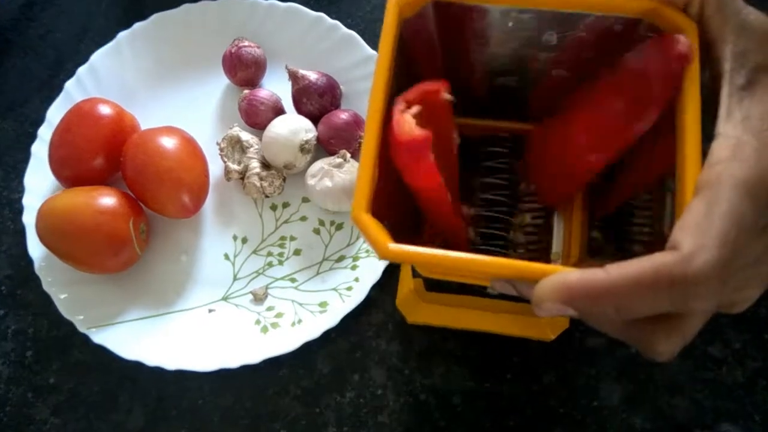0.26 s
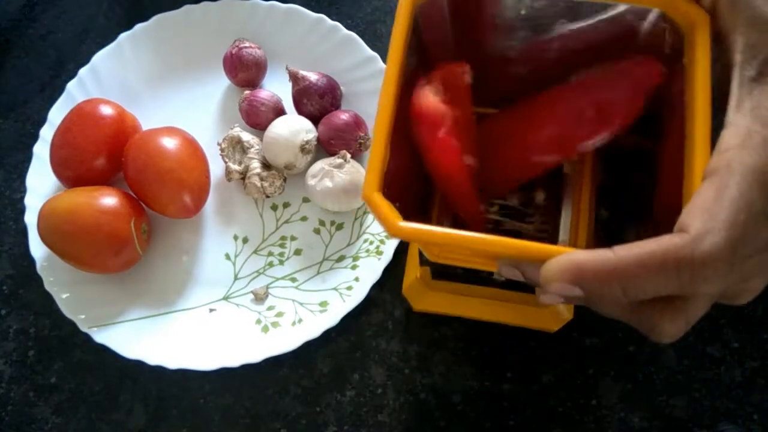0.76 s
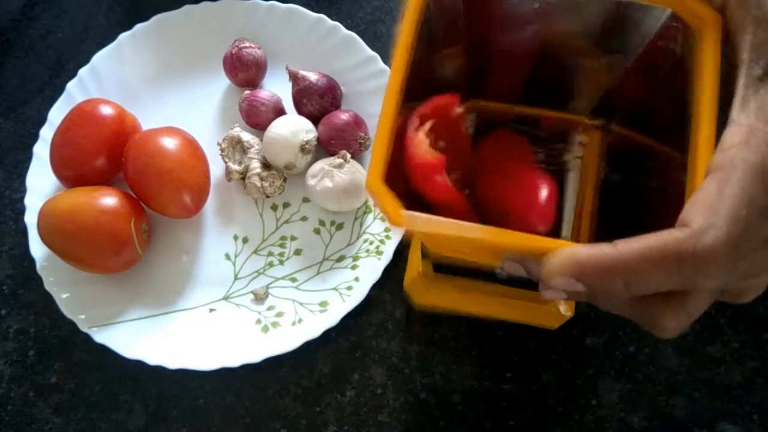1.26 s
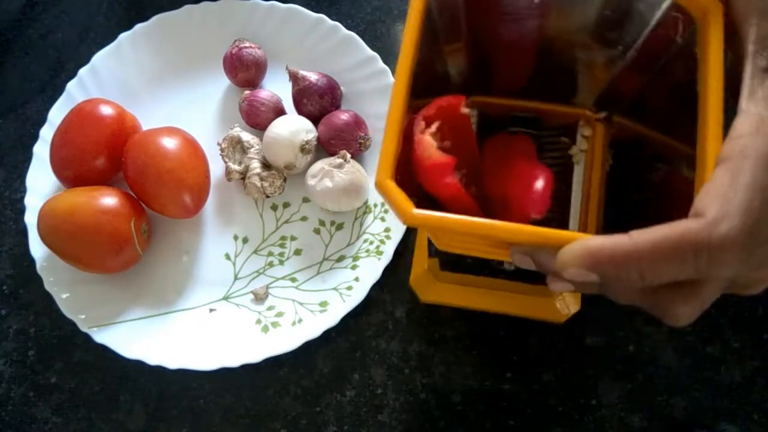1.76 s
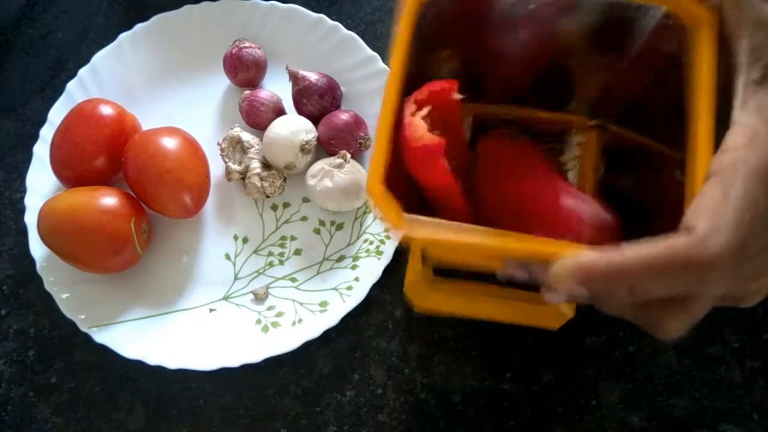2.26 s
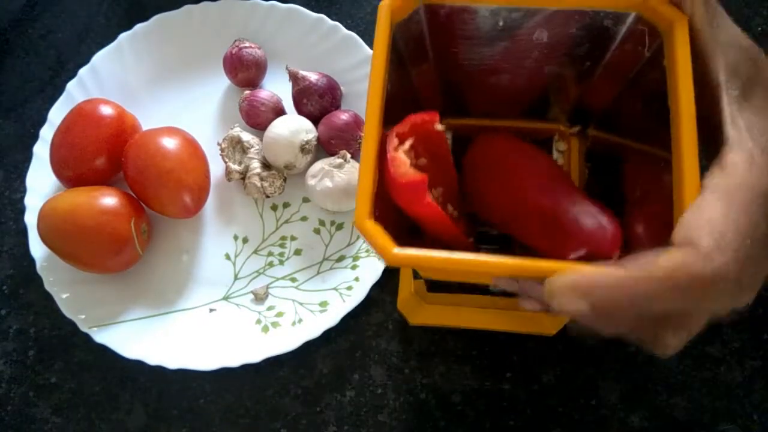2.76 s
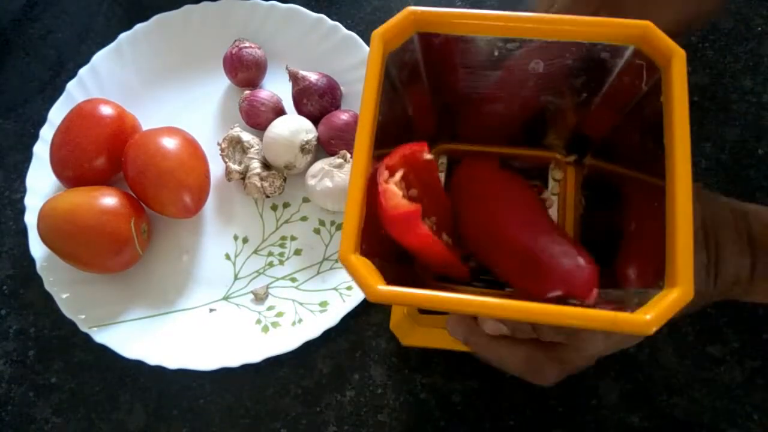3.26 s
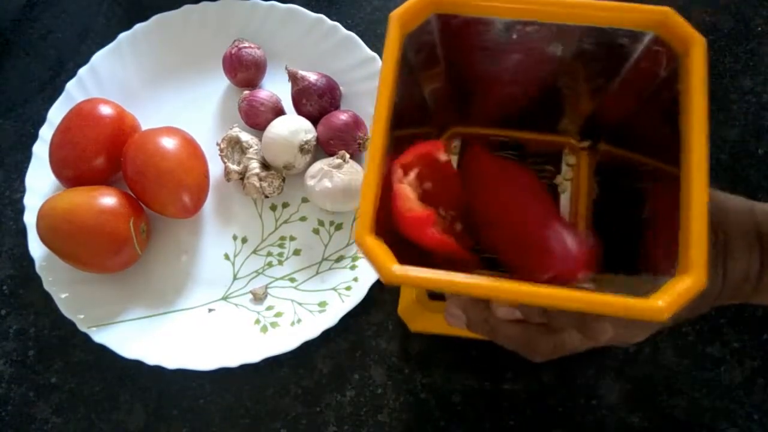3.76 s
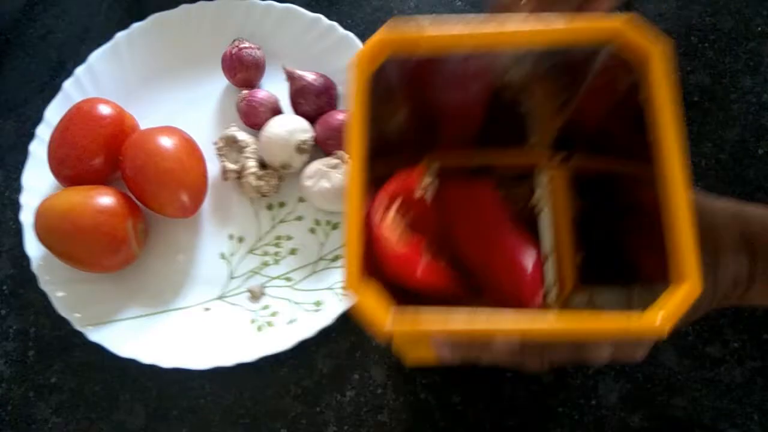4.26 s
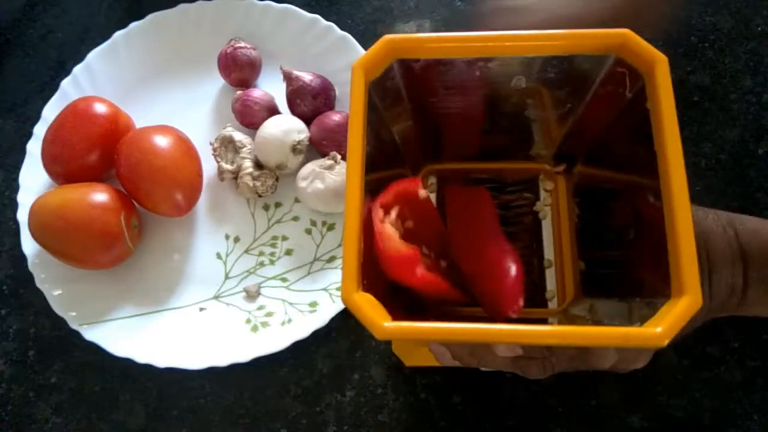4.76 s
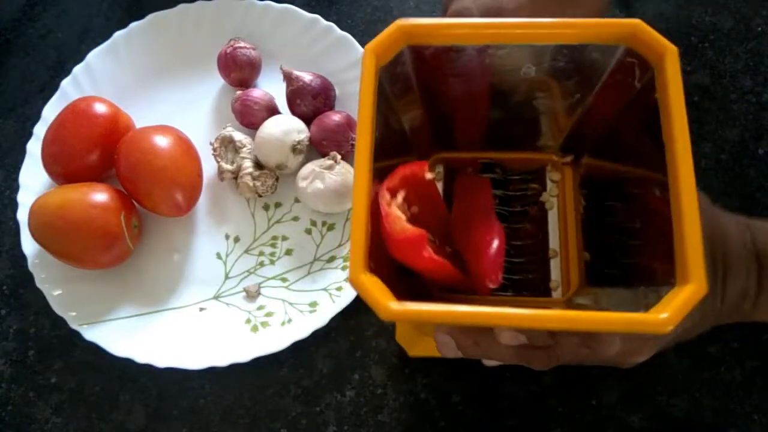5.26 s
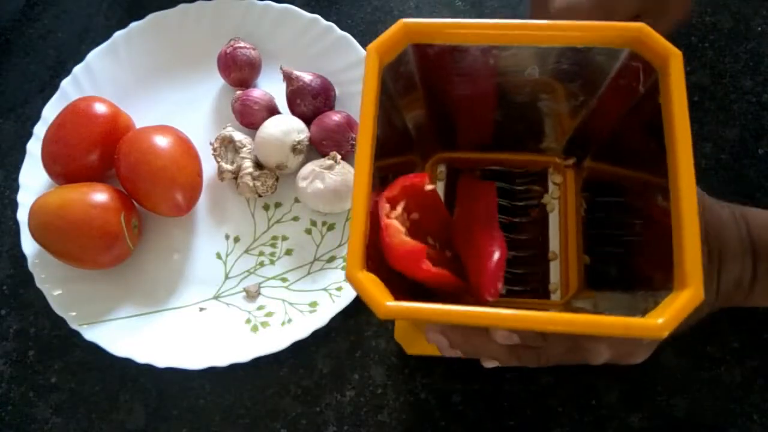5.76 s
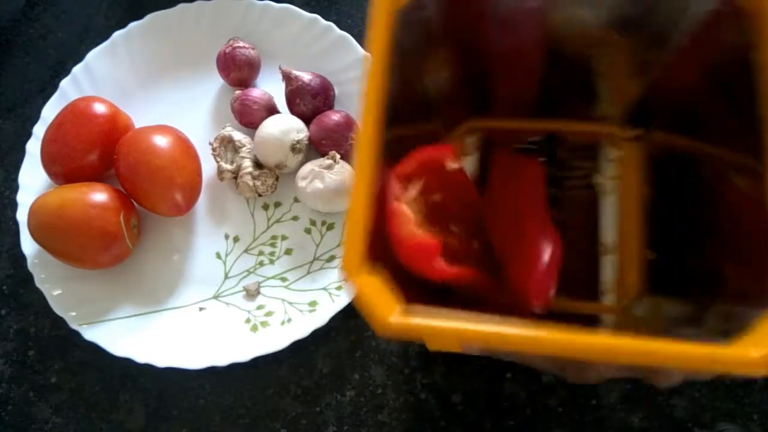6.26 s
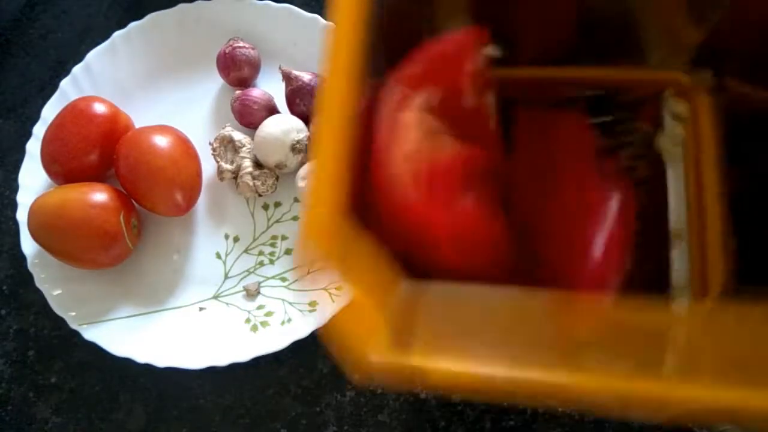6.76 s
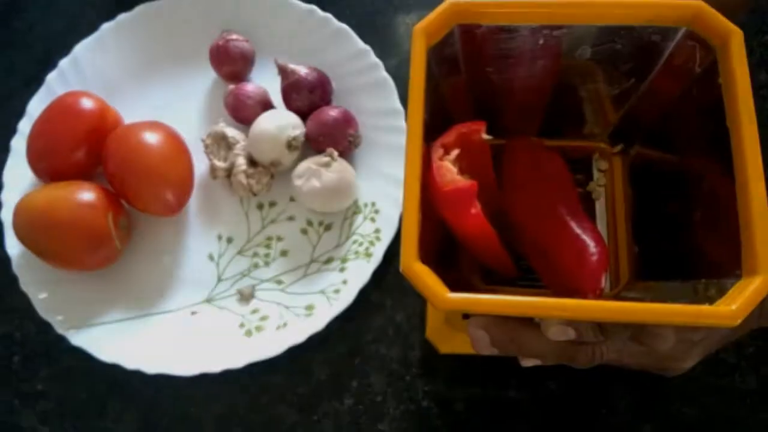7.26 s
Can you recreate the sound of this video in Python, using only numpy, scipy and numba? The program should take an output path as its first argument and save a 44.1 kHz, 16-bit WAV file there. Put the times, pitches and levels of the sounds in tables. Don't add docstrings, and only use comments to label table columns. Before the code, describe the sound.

Irregular hollow plastic clacks, thin metallic ticks and rough scrapes come from a chopper handled in a small, hard-surfaced kitchen. The first two seconds are busy, a near-quiet gap follows, then a second rattling run brings a hard crack before scattered knocks. Low grip rumble passes underneath. The phone pickup is close, left-heavy and slightly dull on top, with short reflections and very faint house hum.

```python
import sys
import numpy as np
from scipy import signal
from scipy.fft import rfft, irfft
from scipy.io import wavfile
from scipy.ndimage import uniform_filter1d
from numba import njit

SR = 44100
rng = np.random.default_rng(int(sys.argv[2]) if len(sys.argv) > 2 else 0)


def file_out(sig):
    cols = np.atleast_2d(sig).T
    lim = np.clip(cols, -1, 1)
    pcm = np.round(lim * 32767).astype(np.int16)
    wavfile.write(sys.argv[1], SR, pcm)


def invert_db(x):
    u = np.asarray(x, float) / 20
    return 10 ** u


N = 331171


def unit(x):
    return x / np.sqrt(np.mean(x ** 2))


def band(x, lo_hz, hi_hz, order=2):
    return signal.sosfilt(signal.butter(order, [lo_hz, hi_hz], "bandpass", fs=SR, output="sos"), x)


def walk(rate_hz):
    hold = max(int(SR / rate_hz), N // 4000)
    levels = rng.standard_normal(4096)[np.arange(N) // hold]
    return 1.51 * uniform_filter1d(uniform_filter1d(levels, hold), hold)


def mode_pole(hz, t60):
    return np.exp(2j * np.pi * hz / SR - np.log(1000) / (t60 * SR))


def ring(x, hz, t60):
    pole = mode_pole(hz, t60)
    return signal.lfilter([0, pole.imag], [1, -2 * pole.real, abs(pole) ** 2], x)


def unlike(hz):
    return np.clip(0.33 + 0.18 * np.log2(hz / 500), 0, .97)


def hum():
    # (frequency [Hz], level per Hz [dB])
    hum_spectrum = [(15, -71.5), (25, -35), (65, -22.5), (86, -6.5), (148, -4.5), (188, -19.5),
                    (232, -11.5), (295, -30.5), (559, -15), (676, -29.5), (2490, -37.5), (2810, -30.5),
                    (7250, -39), (9420, -75.5), (16000, -120)]
    spectrum_hz, spectrum_db = np.transpose(hum_spectrum)
    hz = np.arange(N // 2 + 1) * SR / N + 1
    colour = invert_db(np.interp(np.log(hz), np.log(spectrum_hz), spectrum_db))
    mid, other = unit(irfft(rfft(rng.standard_normal((2, N))) * colour, N))
    right = invert_db(-15.0) * (0.47 * mid + .8 * other)
    return invert_db(-70.0) * np.array([mid, right])


def kitchen(x):
    # (centre [Hz], t60 [s], level [dB])
    echo_bands = [(258.7, 0.85, -7.5), (711, 0.45, -3.5), (1780, 0.38, -5.5), (3960, 0.26, -8),
                  (6440, 0.093, -7)]
    t = np.arange(SR // 2) / SR
    noise = rng.standard_normal((len(echo_bands), 2, len(t)))
    tail = np.zeros((2, len(t)))
    for (hz, t60, db), grain in zip(echo_bands, noise):
        decay = invert_db(db - 60 * t / t60) / np.sqrt(t60 * SR / 14)
        tail += decay * band(grain, hz / 1.67, hz * 1.53)
    tail *= np.clip((t - .003) / 0.006, 0, 1)
    return signal.fftconvolve(tail, x[None], axes=1)[:, :N]


def grip(level_db):
    worktop = unit(ring(rng.standard_normal(N), 145., 0.12))
    worktop = worktop + 0.53 * unit(ring(rng.standard_normal(N), 105., 0.13))
    return unit(band(worktop, 85., 310.0)) * invert_db(level_db + 2.0 * walk(22))


def scrape(part, level_db, grain_db, flicker_db):
    slips = rng.standard_normal((2, N)) * invert_db(grain_db * walk(300) + 2.0 * walk(35))
    out = np.zeros((2, N))
    for hz, db, t60 in part:
        near, other = ring(slips, hz, t60) * invert_db(db + flicker_db * walk(16))
        far = np.sqrt(1 - unlike(hz) ** 2) * near + unlike(hz) * other
        out += [near, far]
    return unit(out) * invert_db(level_db)


@njit
def strike(contacts, poles, gains):
    out = np.zeros((len(contacts), 2, contacts.shape[1]))
    for e in range(len(contacts)):
        for m in range(poles.shape[1]):
            z = 0j
            for i in range(contacts.shape[1]):
                z = z * poles[e, m] + contacts[e, i] + 1e-18
                out[e, 0, i] += (gains[e, m, 0] * z).imag
                out[e, 1, i] += (gains[e, m, 1] * z).imag
    return out


def knocks(part, column, trim_db):
    # (time [s], hopper [dB], walls [dB], blades [dB], swell [ms], chatter [ms])
    knock_events = [(0.024, -46.0, -58.5, -65, 0.7, 17), (0.077, -25, -26.5, -56, 0.3, 3.7),
                    (0.097, -36.5, -48, -55, 0.4, 3.1), (0.105, -39.5, -42, -38, 9.1, 4.9),
                    (0.126, -39.5, -49, -50.0, 4.2, 11.7), (0.164, -36.0, -44.5, -45, 3.6, 13),
                    (0.219, -44.5, -59, -68, 1.4, 5.5), (0.237, -50.5, -58, -48.5, 9.1, 6.1),
                    (0.284, -50, -62, -62, 3.2, 3.2), (0.301, -48, -37.5, -42.5, 6.7, 7.1),
                    (0.331, -61, -57, -49.0, 0.85, 2.4), (0.355, -51, -54, -56, 1.8, 2.5),
                    (0.383, -31.5, -37, -53, 0.74, 9), (0.414, -44, -49.0, -44.5, 1.9, 4.5),
                    (0.427, -48, -48, -46.5, 3.7, 6.9), (0.574, -44, -39, -45, 0.68, 9.4),
                    (0.659, -27.5, -28.0, -42, 0.7, 9.4), (0.759, -35, -47.5, -54.5, 1.8, 13.6),
                    (0.774, -40.5, -44, -41, 7.7, 9.8), (0.789, -36, -31.5, -35.5, 1.4, 6.8),
                    (0.837, -39.5, -41.5, -45, 0.94, 6.9), (0.874, -40, -61, -58.0, 2.8, 4),
                    (0.891, -41.5, -43, -43.0, 25.0, 11.8), (0.938, -44.5, -41, -46, 9.1, 4.3),
                    (1.039, -43, -46.5, -46.0, 11, 15.1), (1.077, -41.5, -42, -46.5, 28, 12),
                    (1.113, -52, -48, -45.0, 21.2, 3.7), (1.141, -38, -47.5, -42, 16.4, 11),
                    (1.165, -36.5, -33.5, -41, 1.2, 5), (1.256, -42.5, -47.5, -43, 10.7, 11.0),
                    (1.287, -43.5, -45.5, -45, 7.7, 8.2), (1.31, -51, -62, -47, 14.6, 21),
                    (1.379, -60, -55, -44.0, 14, 17), (1.43, -41, -46.5, -39.5, 14, 25.0),
                    (1.496, -38, -42.5, -40.5, 0.9, 2.8), (1.526, -37, -42.5, -39, 31, 23.8),
                    (1.624, -41.5, -44, -68, 9.1, 11), (1.656, -45.0, -53, -54, 6.6, 13),
                    (1.715, -57, -45, -44, 5.8, 15.0), (1.808, -55, -56, -42, 3.1, 32),
                    (1.838, -42.0, -40.5, -43, 6.9, 25), (1.9, -40, -39.5, -36, 1, 8.2),
                    (1.91, -39, -38.5, -40.5, 3.5, 9.1), (1.984, -29.5, -28, -35.5, 0.44, 10.3),
                    (2.113, -60, -56.5, -54, 18, 8.8), (2.223, -35.5, -30, -42, 2.7, 6.2),
                    (2.364, -27, -27, -37.5, 0.77, 12), (2.405, -38.5, -46, -45, 14, 19),
                    (2.444, -32.5, -39, -38.5, 2.2, 9.6), (2.496, -49, -54, -65.0, 21, 5.8),
                    (2.551, -41.5, -48, -63, 7.3, 4.9), (2.71, -58, -58, -56.5, 0.45, 4.8),
                    (2.927, -45.5, -55.5, -64, 4.9, 6.7), (3.042, -67, -65, -47.5, 1.1, 1.9),
                    (3.374, -32.5, -36.5, -47, 1.3, 16), (3.48, -40.5, -40.0, -45.5, 0.55, 5.6),
                    (3.49, -46, -41, -39.5, 4.9, 6.4), (3.538, -47.0, -44.5, -37.5, 1.0, 4.9),
                    (3.593, -36.0, -34.5, -44.5, 6.1, 10), (3.656, -36, -39.5, -43, 2.4, 10),
                    (3.671, -31.5, -32, -36, 0.72, 9), (3.753, -34.5, -32.0, -42.5, 0.69, 7.7),
                    (3.788, -51, -48, -50.0, 0.7, 2.6), (3.806, -47.5, -44, -40.5, 0.7, 1.7),
                    (3.819, -41, -37.5, -58, 1, 8.3), (3.95, -43, -51.5, -59, 13, 7.1),
                    (4.032, -30.5, -41.5, -38, 1.2, 8), (4.05, -33.5, -45, -42, 1.7, 5.7),
                    (4.102, -44.5, -48, -62.5, 4.4, 9.3), (4.123, -39.5, -37, -36.5, 0.4, 5.3),
                    (4.161, -47, -46.5, -50, 11, 4.9), (4.18, -50, -53, -50, 19, 2.8),
                    (4.229, -55.5, -50.5, -49, 7.2, 25.0), (4.308, -46.5, -42.5, -35.5, 0.6, 4.5),
                    (4.318, -45, -49, -36, 0.7, 4.6), (4.338, -30.5, -29.5, -34.5, 0.3, 8.1),
                    (4.357, -37, -20.5, -27.5, 1.1, 13.5), (4.382, -40.5, -33.5, -37, 1.8, 37),
                    (4.622, -49, -56, -47.0, 16, 48), (4.667, -38, -40.5, -42.5, 6.9, 26),
                    (4.762, -42, -42.5, -39, 20.7, 14.6), (4.92, -52, -49, -53.5, 21, 11.0),
                    (5.032, -52.5, -57.0, -54, 4.3, 15), (5.082, -40.5, -41, -40.0, 1.3, 4.4),
                    (5.106, -49, -50.5, -37.5, 0.99, 3.5), (5.15, -40, -55.5, -46.0, 15.2, 9),
                    (5.2, -38, -35.0, -56, 0.54, 1.7), (5.21, -39, -47.5, -60, 1.8, 3.6),
                    (5.247, -50, -69, -77, 6.7, 6.2), (5.305, -60, -55, -52.5, 0.4, 1.3),
                    (5.693, -31.5, -28, -44.5, 1.3, 4), (5.74, -45, -50, -66.0, 10, 29),
                    (5.975, -61, -47, -41.5, 0.6, 5.7), (6.026, -29.5, -31.5, -31, 0.6, 8.1),
                    (6.034, -33, -22, -25, 4.1, 3.6), (6.331, -49.5, -69, -58, 5.3, 13),
                    (6.373, -45, -46, -49.5, 1.4, 4.8), (6.51, -48, -62, -45.5, 3.7, 22),
                    (6.567, -45, -44.0, -41.5, 18.3, 13), (6.731, -25, -30, -43, 1.7, 2),
                    (6.758, -33, -40, -39, 2.1, 8.6), (6.95, -40, -45.5, -50.5, 2.1, 7.1),
                    (7.035, -60.5, -64, -47.5, 7.3, 3.3), (7.087, -45, -51.5, -45.5, 2.5, 13),
                    (7.116, -38.5, -72, -57.5, 3.4, 5.0), (7.195, -42.5, -49.5, -45, 1.1, 20),
                    (7.246, -40.5, -60.5, -53, 1.4, 1.9), (7.269, -24, -31, -50, 0.87, 0.94)]
    place_db, detune = 4, 0.021
    hz, db, t60 = np.transpose(part)
    table = np.array(knock_events)
    t = np.arange(6144) / SR
    grit, size = rng.standard_normal((len(table), 2, len(t))).transpose(1, 0, 2)
    place, tune, path = rng.standard_normal((len(table), 3, len(part))).transpose(1, 0, 2)

    swell = np.maximum(table[:, 4:5], .1) / 1000
    chatter = np.maximum(table[:, 5:6], .5) / 1000
    force = np.minimum(t / swell, 1) * np.exp(-np.maximum(t - swell, 0) / (0.92 * chatter))
    contacts = force * grit * np.exp(0.39 * size)
    contacts[:, :1] += 7.5 * np.exp(-swell / 0.0018)

    poles = mode_pole(hz * (1 + detune * tune), t60)
    near = invert_db(db + place_db * place) + 0j
    far = near * np.exp(2.4j * unlike(hz) * path)
    blows = strike(contacts, poles, np.stack([near, far], axis=-1))

    out = np.zeros((2, N + len(t)))
    for row, blow, crest in zip(table, blows, (swell[:, 0] * SR).astype(int)):
        loudest = np.sqrt(np.mean(blow[0, max(crest - 90, 0):crest + 270] ** 2))
        start = int(row[0] * SR)
        out[:, start:start + len(t)] += blow * invert_db(row[column] + trim_db) / loudest
    return out[:, :N]


def scene():
    # (time [s], hopper [dB], walls [dB], blades [dB], grip rumble [dB])
    scrape_levels = [(0.0, -62, -68, -63.5, -72), (0.12, -40, -55.5, -57, -71), (0.28, -45, -70, -61, -73),
                     (0.42, -57, -47.5, -67.5, -53), (0.63, -49.5, -89, -69, -72),
                     (0.67, -52.5, -64, -48, -50), (0.71, -49, -57, -58, -69), (0.79, -49.5, -54, -45, -57),
                     (0.89, -42, -57.5, -54, -72), (1.03, -49, -45.5, -46, -58.5),
                     (1.19, -42, -48, -51.5, -51), (1.44, -58.5, -48, -42.5, -65.5),
                     (1.52, -51, -44, -43, -54), (1.56, -48.5, -48, -46, -70),
                     (1.58, -45, -55.5, -47.5, -51), (1.8, -58, -59, -53, -67),
                     (1.84, -43, -49.5, -50, -57), (2.19, -71, -65, -58.5, -64), (2.23, -32, -64, -52, -52),
                     (2.31, -59, -75, -76, -62), (2.39, -49, -61.5, -52, -58), (2.43, -47, -36, -53, -75),
                     (2.57, -54, -88, -94, -57.5), (2.61, -73, -84, -81, -73), (2.75, -72, -77, -71.5, -72),
                     (3.0, -67.5, -63, -63, -62), (3.1, -58, -51.5, -55, -66), (3.34, -55, -72, -74, -63),
                     (3.44, -59, -65, -59, -59), (3.54, -46, -44, -60, -63), (3.62, -63, -45.5, -49.5, -75),
                     (3.66, -39, -53.5, -60, -48), (3.83, -57.5, -57.5, -59, -68.5),
                     (4.01, -47.5, -50, -51, -69), (4.05, -49, -49, -52, -49.5),
                     (4.21, -53, -52.5, -54.5, -75), (4.31, -44, -54, -53.5, -72),
                     (4.37, -56.5, -33, -40, -48), (4.55, -63, -48, -53, -74), (4.66, -57, -53, -53, -58),
                     (4.72, -50, -48, -43, -76), (4.78, -42.5, -61, -58, -56), (4.96, -53, -53, -56, -59),
                     (5.0, -54, -53, -49.5, -70), (5.08, -51, -59, -48, -54), (5.1, -53, -59, -52, -63),
                     (5.2, -56, -65, -73, -49.5), (5.3, -76, -67, -64, -72), (5.41, -81, -78, -77, -72),
                     (5.67, -61, -72, -66.5, -70), (5.83, -55, -57, -61, -70), (5.87, -63, -60.5, -80, -84),
                     (5.93, -64, -62.5, -55.5, -68), (5.99, -62, -60, -68, -88),
                     (6.03, -66, -60.5, -45, -58), (6.14, -74, -48, -52, -75), (6.46, -55, -59, -58.5, -79),
                     (6.76, -60.5, -63.5, -58, -72.5), (7.05, -50, -61, -61, -74),
                     (7.11, -55, -54, -63, -75), (7.15, -52.5, -68.5, -72, -79),
                     (7.27, -112, -111, -136, -69.5)]
    # (frequency [Hz], level [dB], t60 [s]); the shortest rings are the broad crack
    hopper_modes = [(255, -14.5, 0.055), (343, -10, .05), (403, -8, .06), (525.8, 4.5, 0.16),
                    (632.1, 6.5, 0.083), (720, 1, .07), (876.5, 0, 0.084), (619, 10.5, 0.024)]
    wall_modes = [(1021, 0.5, 0.053), (1138, 1, .04), (1243, -0.5, 0.03), (1417, -8, 0.028),
                  (1600, 3.5, 0.024), (1717, -2.5, .05), (1920, -7.5, 0.03), (2090, -5, 0.033),
                  (2246, -1.5, 0.033), (2563, -7.5, 0.091), (1325, 12.5, 0.0046), (2176, 13, 0.0053)]
    blade_modes = [(3144, -4.5, 0.038), (3379, 1.5, 0.032), (3680, -2.5, 0.028), (4090, 1.5, 0.018),
                   (4619, 2, 0.02), (4950, -18.5, .03), (5500, -7.5, 0.058), (5890, -2.5, 0.041),
                   (6300, -20.5, 0.041), (3940, 13.5, 0.0033), (5280, 17, .003), (6680, 13.5, 0.0017)]
    s, *columns = np.transpose(scrape_levels)
    t = np.arange(N) / SR
    hopper_db, wall_db, blade_db, grip_db = (np.interp(t, s, levels) for levels in columns)

    hopper = knocks(hopper_modes, column=1, trim_db=5.0)
    hopper += scrape(hopper_modes, hopper_db + 4.5, grain_db=3.0, flicker_db=5.0)
    walls = knocks(wall_modes, column=2, trim_db=6.5)
    walls += scrape(wall_modes, wall_db + 2.5, grain_db=3.0, flicker_db=3.5)
    blades = knocks(blade_modes, column=3, trim_db=6.5)
    blades += scrape(blade_modes, blade_db + 4.0, grain_db=3.0, flicker_db=3.0)

    chopper = band(hopper, 300.0, 1800.0) + band(walls, 820.0, 3600.) + band(blades, 2500., 7800.0)
    direct = (chopper + grip(grip_db + 2.0)) * invert_db([[0], [-13.5]])  # left, right [dB]
    echoes = kitchen(chopper[0]) * invert_db([[0], [-12.5]])
    return direct + echoes + hum()


def band_limit(x):
    return signal.sosfilt(signal.butter(12, 15500, fs=SR, output="sos"), x)


def record(dry):
    t = np.arange(N) / SR
    narrow = signal.sosfilt(signal.cheby1(6, .5, 6700., fs=SR, output="sos"), dry)
    mirror = narrow * np.cos(2 * np.pi * 16000 * t)
    wide = narrow + invert_db(-7.5) * band(mirror, 7950.0, 9070.0, order=3)
    wide += invert_db(-49.0) * band(mirror, 10500., 14500.)
    stop_s = 7.2775
    return band_limit(wide * (t < stop_s))


dry = scene()
out = record(dry)
file_out(out)
```